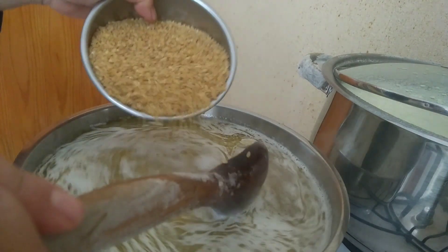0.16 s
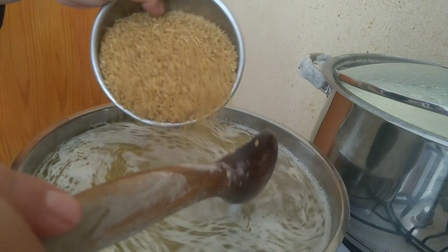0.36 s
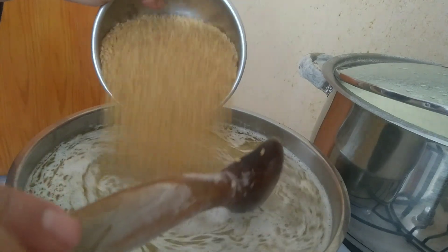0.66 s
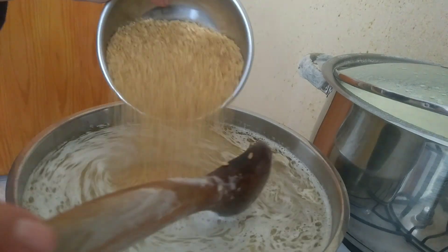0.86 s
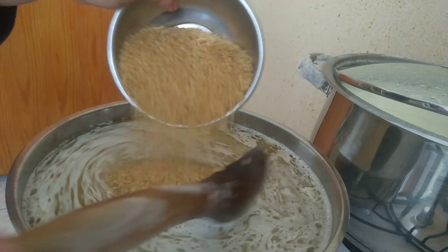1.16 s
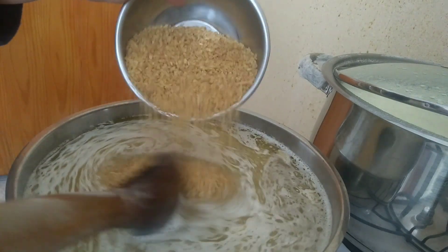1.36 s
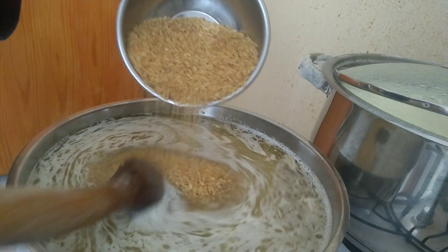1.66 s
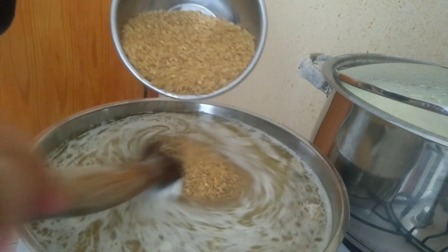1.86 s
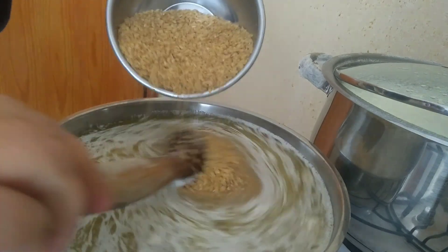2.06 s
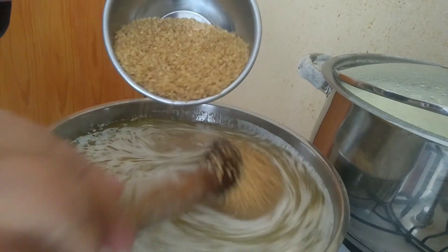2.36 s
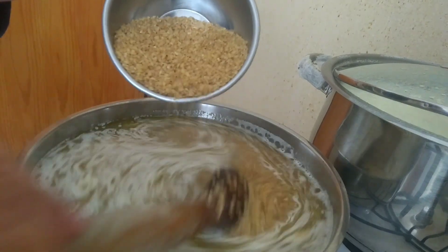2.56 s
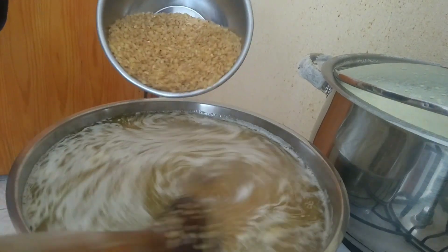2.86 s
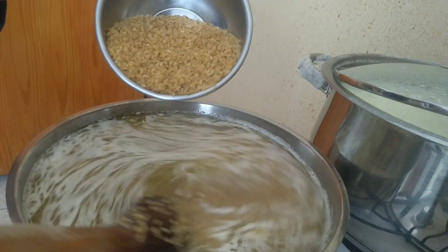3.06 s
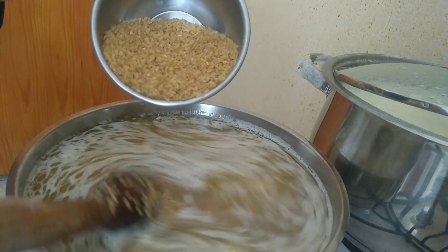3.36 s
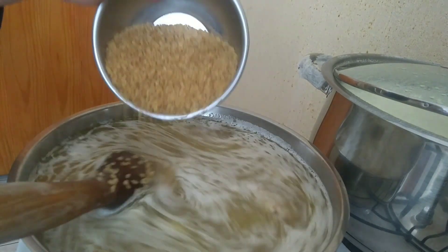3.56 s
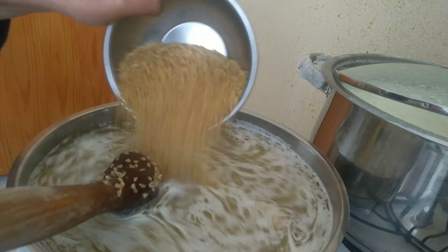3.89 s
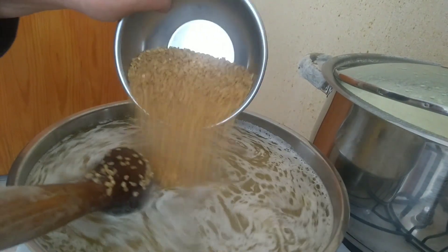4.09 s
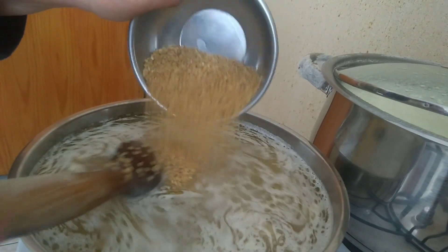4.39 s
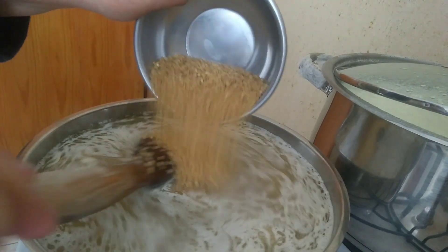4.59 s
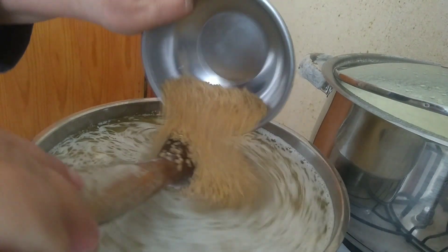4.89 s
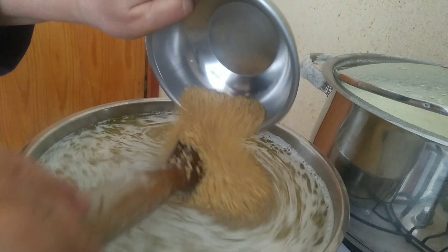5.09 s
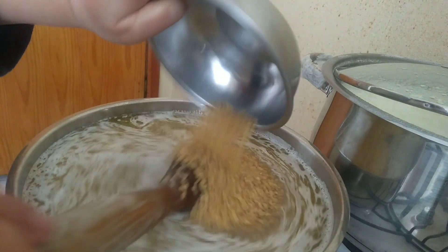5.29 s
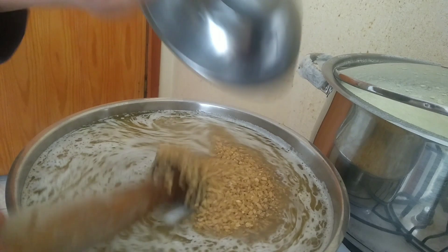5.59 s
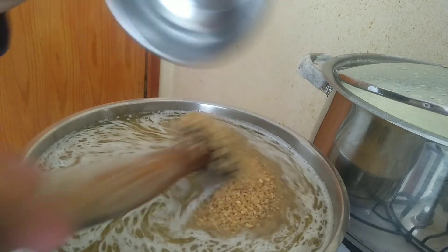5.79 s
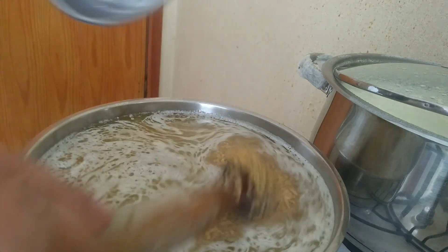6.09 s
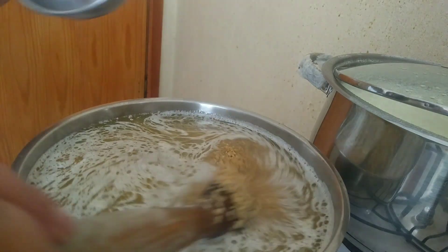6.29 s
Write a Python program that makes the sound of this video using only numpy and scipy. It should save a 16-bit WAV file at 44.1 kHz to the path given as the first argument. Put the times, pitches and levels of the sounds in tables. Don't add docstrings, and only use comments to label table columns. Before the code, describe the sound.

Two pours of dry grain from a metal bowl into a large full pot: crisp dense patter around the high treble, with a light ringing of the bowl. Soft spoon taps open it, a rapid cluster of hard wooden knocks separates the pours, softer knocks follow late in the second, and scraping knocks close it. Tiny grain pings and dull handling thumps are scattered through. Close handset microphone, short kitchen reverberation, low hum and noise reduction leaving quiet gaps.

```python
import sys
import numpy as np
from scipy import signal
from scipy.fft import rfft, irfft, next_fast_len
from scipy.io import wavfile
from scipy.ndimage import uniform_filter1d

SR = 44100
rng = np.random.default_rng(int(sys.argv[2]) if len(sys.argv) > 2 else 0)


def linear_from_db(decibels):
    return 10 ** (np.asarray(decibels, float) / 20)


def transcribe(signal):
    frames = np.atleast_2d(signal).T
    limited = np.clip(frames, -1, 1)
    pcm = np.round(limited * 32767).astype(np.int16)
    wavfile.write(sys.argv[1], SR, pcm)


N = 283993


def rms_one(x):
    return x / np.sqrt(np.mean(x ** 2) + 1e-20)


def at_hz(points, hz):
    table_hz, values = np.transpose(points)
    return np.interp(np.log(hz), np.log(table_hz), values)


def drift(rate):
    r = np.exp(-80 * np.pi * rate / SR)
    white = rng.standard_normal(N // 40 + 2002)
    slow = signal.lfilter([1], [1, -2 * r, r * r], white)[2000:]
    return np.interp(np.arange(N) / 40, np.arange(len(slow)), rms_one(slow))


def highpass(x, order, hz):
    return signal.sosfilt(signal.butter(order, hz, "high", fs=SR, output="sos"), x)


def bandpass(x, order, low_hz, high_hz):
    return signal.sosfilt(signal.butter(order, [low_hz, high_hz], "band", fs=SR, output="sos"), x)


def ring(clicks, hz, t60):
    r, w = linear_from_db(-60 / (t60 * SR)), 2 * np.pi * hz / SR
    return signal.lfilter([0, np.sin(w)], [1, -2 * r * np.cos(w), r * r], clicks + 1e-18)


def resonate(x, hz, width_hz):
    return ring(x, hz, np.log(1000) / np.pi / width_hz)


def coloured(x, gain):
    size = next_fast_len(N)
    hz = np.arange(size // 2 + 1) * SR / size + 1
    return irfft(rfft(x, size) * gain(hz), size)[..., :N]


def ports(pair):
    # pitch_hz, left_right_correlation
    likeness = [(60, 0.995), (150, 0.96), (300, 0.75), (600, 0.33), (1100, 0.32), (2000, -0.36),
                (3300, -0.073), (5000, -0.25), (8000, 0.11), (14000, -0.028)]
    # pitch_hz, left_minus_right_db
    port_tilt = [(400, 0.5), (800, -1), (1200, 9), (1700, -14.5), (2200, -1.5), (6000, 2.5), (10000, -4),
                 (15000, -1.5)]

    def alike(hz):
        return np.clip(at_hz(likeness, hz), -.999, .999)

    mid = coloured(pair[0], lambda hz: np.sqrt((1 + alike(hz)) / 2))
    side = coloured(pair[1], lambda hz: np.sqrt((1 - alike(hz)) / 2))
    left_right = np.array([mid + side, mid - side])
    return coloured(left_right, lambda hz: linear_from_db(at_hz(port_tilt, hz) * [[.5], [-.5]]))


def kitchen(x, cut_s):
    # pitch_hz, t60_s
    decay = [(200, 0.28), (700, 0.26), (2000, 0.27), (6000, 0.18)]
    t = np.arange(round(.4 * SR)) / SR
    echoes, white = 0, rng.standard_normal((2, len(t)))
    for hz in 100 * 2 ** np.arange(7):
        echoes = echoes + bandpass(white, 2, hz, 2 * hz) * linear_from_db(-60 * t / at_hz(decay, 0.93 * hz))
    echoes = echoes * np.minimum(t / 0.00083, 1) * linear_from_db(-12 * (t / cut_s) ** 4)
    return signal.fftconvolve(x, echoes / np.sqrt(np.sum(echoes ** 2) / 2), axes=1)[:, :N]


def background():
    # multiple, level_db
    harmonics = [(1, -59.5), (2, -70.5), (3, -74), (5, -86.5), (6, -87)]
    # pitch_hz, width_hz, level_db
    rumble = [(100.7, 9.2, -88.5), (140, 15.8, -72), (157, 83, -76)]
    # pitch_hz, width_hz, level_db
    whistles = [(855, 63, -85.5), (1634, 150, -83.5), (2800, 81, -111.5), (3670, 59, -104),
                (11700, 55, -91.5)]
    # pitch_hz, level_db (per Hz)
    floor_colour = [(15, -36), (25, -6), (55, 2), (75, -16), (141, -20), (263, -25), (293, -26.5),
                    (370, -32), (1830, -44), (2630, -41), (2930, -14.5), (3160, -110), (4110, -26.5),
                    (13000, -98)]

    motor_hz = 49.34 + 0.11 * drift(0.46)
    turn = 2 * np.pi * np.cumsum(motor_hz) / SR
    hum = sum(np.sqrt(2) * linear_from_db(db + 1.2 * drift(5.3)) * np.sin(k * turn + 1.6 * k * k)
              for k, db in harmonics)

    white = rng.standard_normal((2, N))
    narrow = 0
    for hz, width_hz, db in [*rumble, *whistles]:
        if hz < 500:
            waver_db = 2.5 * drift(0.87)
        elif hz < 2000:
            waver_db = 5.5 * drift(4.2)
        else:
            waver_db = 8.9 * drift(47)
        tone = resonate(resonate(white, hz, width_hz), hz, width_hz)
        narrow = narrow + linear_from_db(db + waver_db) * rms_one(tone)

    swapped = white[::-1]
    low = rms_one(coloured(swapped, lambda hz: linear_from_db(at_hz(floor_colour, hz)) * (hz > 165) * (hz < 1400)))
    high = rms_one(coloured(white, lambda hz: linear_from_db(at_hz(floor_colour, hz)) * (hz >= 1400)))
    deep = rms_one(coloured(swapped, lambda hz: (hz > 22) * (hz < 165)))
    floor = linear_from_db(-75.5 + drift(26)) * low
    floor = floor + linear_from_db(-82.0 + 4 * drift(13.0)) * high
    floor = floor + linear_from_db(-67.5 + drift(0.8)) * deep
    return hum * linear_from_db([[.15], [-.15]]) + ports(narrow + floor)


def bumps():
    # start_s, peak_db, pitch_hz
    thumps = [
        (0.747, -47, 140),
        (0.839, -48, 140),
        (3.675, -47.5, 152),
        (4.819, -42.5, 144),
        (5.182, -59, 140),
    ]
    out, t = np.zeros(N + 6000), np.arange(6000) / SR
    for s, db, hz in thumps:
        i = round(s * SR)
        envelope = linear_from_db(db + 8.5 - 60 * t / 0.1) * (1 - np.exp(-t / 0.011))
        out[i:i + 6000] += envelope * np.sin(2 * np.pi * hz * t)
    return out[:N]


def scuffs():
    # start_s, level_db, t60_s
    drags = [(3.034, -69.5, 0.3), (3.218, -70, 0.32), (6.278, -47, 0.057), (6.298, -74, 0.13),
             (6.339, -61, 0.12), (6.365, -70, 0.26)]
    # pitch_hz, width_hz, level_db
    wall = [(1460, 400, -6), (2100, 240, -12), (2850, 420, 2.5), (3620, 350, 2), (4440, 340, -3.5),
            (5260, 500, -8.5), (6200, 610, -2)]
    t = np.arange(N) / SR
    drag = sum(linear_from_db(db - 60 * np.maximum(t - s, 0) / t60) * np.clip((t - s) / 0.0053, 0, 1)
               for s, db, t60 in drags)
    white = rng.standard_normal((2, N))
    out = 0
    for hz, width_hz, db in wall:
        rough = rms_one(resonate(white, hz, width_hz)) * drag
        out = out + linear_from_db(db) * resonate(rough, hz, width_hz) * (np.pi * width_hz / SR)
    return out * linear_from_db(6.0)


def spoon(scatter_db, modes_db, clatter_db, wood_db):
    # start_s, body_db, thud_db (relative), hardness_db, spoon_pitch_hz
    knocks = [(0.001, -42, -11, -15, 382), (0.004, -41.5, -39, -21, 747), (0.03, -48.5, -13, -17, 616),
              (2.671, -79.5, 27, 34, 842), (2.710, -33.5, -30, -3, 654), (2.74, -27.5, 0.5, 4, 692),
              (2.76, -39, 0, -1, 695), (2.794, -30.5, 3.5, 7, 710), (2.85, -51, 15.5, 1, 526),
              (2.885, -53, 13.5, -9, 680), (2.905, -65, 20, -18, 510), (3.035, -81.5, -14, 35.5, 620),
              (3.218, -80, -4, 27, 830), (3.572, -64, -13, -34, 880), (3.604, -57.5, -11, 10.5, 1040)]
    soft_knocks = [(2.203, -45.5, 1.5, -19, 786), (5.039, -44.5, -34, -8, 626), (5.069, -43.5, -3, 2, 660),
                   (5.098, -46, -2.5, -8, 710), (5.175, -44.5, -41, -13, 576), (5.199, -48.5, -39, -1, 583)]
    last_knocks = [(6.28, -40, -49, -11, 660), (6.299, -42.5, -44, -26, 760), (6.34, -40, -48, -21, 697),
                   (6.373, -48, -46, -26, 780)]
    # pitch_hz, level_db, t60_s
    pot = [(140, -12, 0.43), (225.7, -4.5, 0.53), (288.2, -1.5, 0.55), (356, -3.5, 0.18), (365, 4, 0.17),
           (495, -18, 0.31), (695, -11, 0.2), (766, 1, 0.16), (1126, -29, 0.07), (1430, -7, 0.049),
           (1493, -2, 0.22), (2320, -17, 0.028), (3320, -22, 0.089), (6040, -3, 0.011)]
    # low_hz, high_hz, level_db, t60_s
    clatter = [(176, 590, 0.5, 0.023), (1050, 2450, 2, 0.0083), (1760, 3260, 1.5, 0.0018),
               (2710, 3510, 0, 0.027), (4570, 7260, 2, 0.025), (7800, 22000, 2.5, 0.018)]

    rows = np.vstack([knocks, soft_knocks, last_knocks])
    start_s, body_db, thud_db, hardness_db, pitch_hz = rows.T
    at = (start_s * SR).astype(int)
    luck = rng.standard_normal((len(rows), len(pot)))
    clack_db = np.minimum(7 + 0.24 * hardness_db, 22)
    regions_db = body_db + np.array([thud_db, 0 * at, clack_db, hardness_db])

    def strength(hz):
        return linear_from_db(regions_db[np.searchsorted([450, 1000, 2500], hz)])

    size = N + 4000
    out, white, t = np.zeros((2, size)), rng.standard_normal((2, size)), np.arange(4000) / SR
    white[:, at] = 4.5
    spoon_db = body_db - 0.95 * np.clip(hardness_db + 3, 0, 9)
    for i, db, hz in zip(at, spoon_db, pitch_hz):
        burst = white[:, i:i + 4000] * linear_from_db(db + wood_db - 6.0 - 60 * t / 0.093)
        out[:, i:i + 4000] += bandpass(burst, 3, hz / 1.215, hz * 1.262)
        tok = linear_from_db(db + 1 - 60 * t * hz / 22.5) * (1 - np.exp(-t / 0.0042))
        out[0, i:i + 4000] += tok * np.sin(2 * np.pi * hz * t)

    sample = np.arange(size)
    latest = np.maximum.accumulate(np.where(np.isin(sample, at), sample, 0))
    since_s = (sample - latest) / SR
    gate = linear_from_db(-6 * np.minimum(since_s / 0.2, 2) ** 6)
    for k, (hz, db, t60) in enumerate(pot):
        clicks = np.zeros(size)
        clicks[at] = strength(hz) * linear_from_db(db + modes_db + scatter_db * luck[:, k])
        out += ring(clicks, hz, t60) * gate * [[1], [(-1) ** k]]

    for low_hz, high_hz, db, t60 in clatter:
        clicks = np.full(size, 1e-18)
        blow = strength(np.sqrt(low_hz * high_hz)) ** (1 + .5 * (low_hz > 7000))
        clicks[at] = blow * linear_from_db(db + clatter_db) * np.sqrt(SR / (high_hz - low_hz))
        fading = signal.lfilter([1], [1, -linear_from_db(-60 / (t60 * SR))], clicks)
        out += bandpass(white * fading, 3, low_hz, high_hz)
    return highpass(out[:, :N], 3, 125)


def strays(cycles):
    # start_s, peak_db, pitch_hz, pan_db
    grains = [(0.156, -46, 6200, 2), (0.1366, -54, 6440, 1), (0.2406, -47.5, 7600, -1),
              (0.2957, -63, 4570, 7), (1.4118, -64, 5870, 2), (1.766, -32.5, 6650, 0),
              (1.8764, -56, 6400, 0.5), (1.922, -46, 6700, -3), (2.017, -48, 6700, 17),
              (2.098, -45, 6200, 6), (2.2095, -42.5, 6500, -9), (2.216, -43, 7000, -11),
              (2.242, -48, 6940, -5), (2.303, -44.5, 6140, -1), (2.392, -51, 6100, 13),
              (2.4126, -50, 6460, 1), (2.492, -51, 6000, -6), (2.6562, -54, 6130, 12),
              (2.9617, -53, 6300, -8), (2.975, -53.5, 6140, 4), (3.036, -58, 6500, -1),
              (3.062, -47.5, 6300, -2), (3.1238, -50.5, 6460, 5), (1.522, -40, 5560, -1),
              (3.602, -54, 6330, 27), (3.673, -39, 5600, 0), (5.65, -65, 5850, 27),
              (5.749, -62, 5320, 22.5), (1.602, -46.5, 5150, -16), (5.906, -55, 6250, 5),
              (0.5087, -48, 6000, -1), (0.613, -47, 5240, -2), (1.507, -43, 6100, 7),
              (1.6636, -46.5, 4700, 0.5), (3.713, -43, 7050, -3), (3.732, -51, 6100, 2),
              (3.745, -52, 6330, 2), (4.1315, -46, 6600, 1), (4.146, -51, 6320, 1), (5.048, -46, 5900, 7),
              (3.62, -55, 8000, 2), (3.039, -53, 6400, 1)]
    partials = [(.82, 4), (1, 12), (1.27, 1.5), (1.5, -22.5)]   # ratio, level_db
    out, t = np.zeros((2, N + 600)), np.arange(600) / SR
    for s, db, hz, pan_db in grains:
        i = round(s * SR)
        ping = sum(linear_from_db(part_db) * np.sin(2 * np.pi * ratio * hz * t) for ratio, part_db in partials)
        ping = ping * linear_from_db(db - 60 * t * hz / cycles) * (1 - np.exp(-t / .0008))
        out[:, i:i + 600] += ping * linear_from_db([[pan_db / 2], [-pan_db / 2]])
    return out[:, :N]


def flow(mean_flow_db):
    # start_s, flow_db, slide_db, fall_db
    trickle = [
        (0.0, -55, -12, -13),
        (0.22, -56, -12, -15.5),
        (0.41, -60.5, -9.5, -15.5),
    ]
    first_pour = [
        (0.469, -48.5, -14, -12.5),
        (0.655, -38, -20.5, -7.5),
        (0.87, -42, -21.5, -7.5),
        (1.15, -49.5, -21.5, -6.5),
        (1.56, -49, -22, -5),
        (1.78, -51, -21, -5.5),
        (1.95, -53.5, -19, -8),
        (2.3, -57.5, -17, -10.5),
        (2.66, -71, -4, -21.5),
    ]
    dribble = [
        (2.978, -60, -5, -17.5),
        (3.015, -79, 0, -19),
        (3.06, -66.5, -5.5, -20),
        (3.15, -77.5, -1, -24),
        (3.28, -100, -21.5, 1),
        (3.52, -76, -10.5, -15.5),
    ]
    second_pour = [
        (3.575, -67, -22.5, -5),
        (3.611, -54.5, -21.5, -5.5),
        (3.74, -45, -20, -9),
        (3.94, -41, -19, -9.5),
        (4.22, -43.5, -21.5, -8),
        (4.62, -47, -21.5, -5),
        (4.829, -51, -23, -5),
        (5.32, -51.5, -22, -5),
        (5.448, -57, -30.5, -4),
    ]
    last_shake = [
        (5.598, -81.5, -2, -33),
        (5.65, -68, -13, -26),
        (5.78, -72.5, -11, -22),
        (5.84, -77, -3, -28),
        (6.01, -51.5, -43, -0.5),
        (6.14, -65, -11.5, -18),
        (6.3, -81, -14, -33),
        (6.39, -68.5, -16, -26),
        (6.44, -73, -12, -24),
    ]
    # start_s, extra_flow_db, half_length_s
    surges = [(0.657, 0.5, 0.03), (1.142, -2.5, 0.018), (1.924, 5, 0.003), (2.238, 4.5, 0.02),
              (2.4, 1.5, 0.028), (3.74, 3.5, 0.017), (3.785, -2.5, 0.02), (4.068, -1, 0.052),
              (4.439, 1.5, 0.023), (4.683, -2.5, 0.047), (4.147, 2, 0.019), (4.597, 1, 0.026),
              (4.787, 0.5, 0.014), (5.218, 3.5, 0.03), (5.302, 2, 0.021)]
    s, *columns = np.vstack([trickle, first_pour, dribble, second_pour, last_shake]).T
    t = np.arange(N) / SR
    flow_db, slide_db, fall_db = [np.interp(t, s, column) for column in columns]
    clumps_db = sum(db * np.exp(-((t - at) / half) ** 2) for at, db, half in surges)
    return flow_db + clumps_db - mean_flow_db, slide_db + 20, fall_db + 7


def pour(spread_db, cycles, clump_db, hiss_share):
    # pitch_hz, level_db (per Hz)
    patter_colour = [(1120, -46), (1900, -30), (2300, -11), (3120, -3.5), (3690, 3), (4060, -4.5),
                     (4400, -4), (6260, 7), (10100, -11), (15000, -8.5), (15700, -8.5)]
    # pitch_hz, width_hz, half_full_db, emptying_db_per_s
    bowl = [(916, 48, -7.5, -1.2), (1031, 105, -10, -1), (1246, 23, 1.5, 4.5), (1396, 202, 3, -4.5),
            (1580, 206, 8.5, 0), (1877, 9.5, -5.5, -3), (2070, 55, 1, 0.2)]
    # start_s, pitch_hz
    heap = [(0.4, 5950), (1.56, 6200), (1.66, 5620), (1.72, 6420), (2.4, 6270), (2.84, 5640), (3.13, 6510),
            (3.31, 6420), (3.37, 5400), (3.44, 6720), (3.66, 5850), (3.71, 6160), (3.98, 5760),
            (4.05, 6400), (5.7, 5870), (5.76, 5340), (5.88, 6500), (6.2, 6350)]
    heap_mean_hz, half_full_s, mean_flow_db = 6270, 3, -50

    swing_db, slide_db, fall_db = flow(mean_flow_db)
    patter_db = mean_flow_db + swing_db
    scrape_db = -77.5 + 2.04 * swing_db + 0.85 * slide_db - 1.3 * fall_db
    rustle_db = -59 + 0.83 * swing_db + 1.6929 * slide_db + 1.73 * fall_db
    sizzle_db = -58 + 0.92 * swing_db + 0.71 * slide_db + 2 * fall_db
    bowl_db = -69.5 + 1.3567 * swing_db + 2.1932 * slide_db + 1.42 * fall_db

    density = np.clip(3.7 + .035 * swing_db, 3.5, 4.3)
    sizes = linear_from_db(spread_db * np.minimum(rng.exponential(1, (2, N)), 4)) * rng.choice([-1, 1], (2, N))
    clumps = drift(18)
    rate = 10 ** density * linear_from_db(clump_db * clumps)
    strikes = rng.random((2, N)) < rate / SR
    clicks = sizes * strikes * 10 ** (-density / 2)
    clicks = rms_one(clicks) + hiss_share * rng.standard_normal((2, N))

    t = np.arange(N) / SR
    pitches, dealt = np.geomspace(2000, 15200, 15), rng.integers(0, 15, (2, N))
    shift_octaves = np.log2(np.interp(t, *np.transpose(heap)) / heap_mean_hz)
    rings = []
    for k, hz in enumerate(pitches):
        pull_db = 46 * shift_octaves * np.log2(hz / heap_mean_hz) * (4500 < hz < 9000)
        gain = linear_from_db(at_hz(patter_colour, hz) + pull_db) * hz
        rings.append(gain * ring(clicks * (dealt == k), hz, cycles / hz))
    parts = (rings[:3], rings[3:6], rings[6:11], rings[11:])
    scrape, rustle, patter, sizzle = [rms_one(highpass(sum(part), 3, 1900)) for part in parts]

    body = 0
    for hz, width_hz, db, per_s in bowl:
        mode = resonate(resonate(clicks, hz, 2 * width_hz), hz, max(width_hz, 70))
        body = body + linear_from_db(db + per_s * (t - half_full_s) + 2 * drift(4.5)) * rms_one(mode)
    body = highpass(body, 3, 820)

    bright = highpass(linear_from_db(patter_db) * patter + linear_from_db(rustle_db) * rustle, 4, 2750)
    sizzle = linear_from_db(sizzle_db + 0.73 * drift(56) + 0.91 * clumps) * sizzle
    return linear_from_db(scrape_db) * scrape + bright + sizzle + linear_from_db(bowl_db) * rms_one(body)


def scene():
    grain = pour(spread_db=1.0, cycles=19.0, clump_db=5.0, hiss_share=1.0)
    lone = strays(cycles=28.2)
    knock = spoon(scatter_db=0.0, modes_db=-14.0, clatter_db=-10.5, wood_db=18.5) + scuffs()
    dull_knock = coloured(knock, lambda hz: 1 / (1 + (hz / 10400) ** 6))
    wet = kitchen(linear_from_db(0.47) * dull_knock + linear_from_db(-6.0) * grain + linear_from_db(6.5) * lone, cut_s=0.49)
    return ports(linear_from_db(2.5) * grain + knock + wet) + linear_from_db(5.5) * lone + bumps() + background()


def starve(x):
    # pitch_hz, level_db (under the loudest treble band)
    dropout = [(1500, -34), (2050, -30), (2230, -21), (2400, -17), (2560, -19), (2720, -12), (2900, -23),
               (3170, -9), (3550, -19), (4050, -8), (4600, -20), (7300, -21), (7900, -15), (8500, -14),
               (8900, -23), (9600, -17), (12000, -21), (14000, -20), (15500, -15)]
    # low_hz, high_hz
    spared = [(10250, 10800), (12300, 12850), (14100, 14700)]
    window = np.sin(np.pi * (np.arange(2048) + .5) / 2048) ** 1.5
    hz, s, z = signal.stft(x, SR, window=window, nperseg=2048)
    power = np.mean(np.abs(z[:, :1020]) ** 2, axis=0)
    band_db = 10 * np.log10(power.reshape(170, 6, -1).mean(axis=1) + 1e-20)
    band_hz = hz[3:1020:6]
    loudest_db = uniform_filter1d(band_db[22:], size=8, axis=0).max(axis=0)
    whim = uniform_filter1d(rng.standard_normal(band_db.shape), size=2, axis=0)
    whim_db = 5 * rms_one(uniform_filter1d(whim, size=3, axis=1))
    limit_db = at_hz(dropout, band_hz) * np.where(band_hz > 1500, 1, 9)
    margin_db = uniform_filter1d(band_db, size=3, axis=1) + whim_db - loudest_db - limit_db[:, None]
    is_spared = np.any([(band_hz > low) & (band_hz < high) for low, high in spared], axis=0)
    hungry = (band_hz > 9350) & ~is_spared
    margin_db = margin_db - 18 * hungry[:, None] * np.clip(1 - s / .44, 0, 1) ** .5
    loud_knock = band_db[3:12].mean(axis=0) > -66
    margin_db = margin_db + 30 * (band_hz < 12900)[:, None] * loud_knock
    keep = 1 / (1 + np.exp(-np.clip(margin_db / .3, -9, 9)))
    keep = np.repeat(keep, 6, axis=0) * (hz[:1020] < 15850)[:, None]
    return signal.istft(z * np.pad(keep, [(0, 5), (0, 0)]), SR, window=window, nperseg=2048)[1][:, :N]


def band_limit(x):
    return signal.sosfilt(signal.butter(12, 16630, fs=SR, output="sos"), x)


def record(dry):
    return band_limit(starve(dry))


dry = scene()
out = record(dry)
transcribe(out)
```